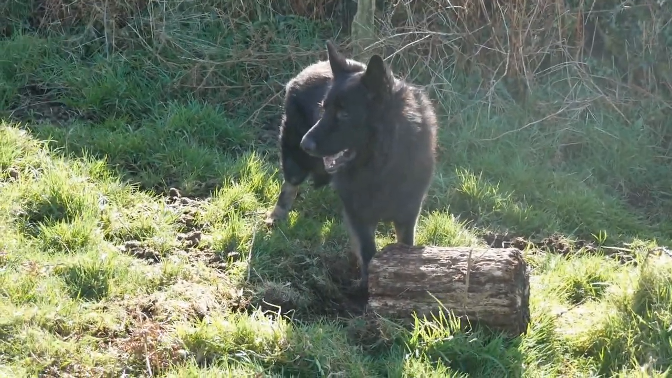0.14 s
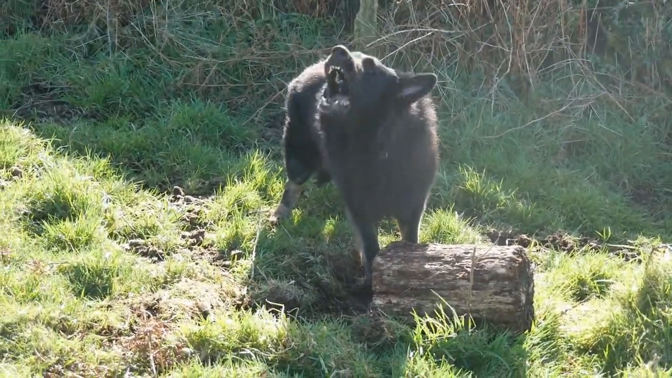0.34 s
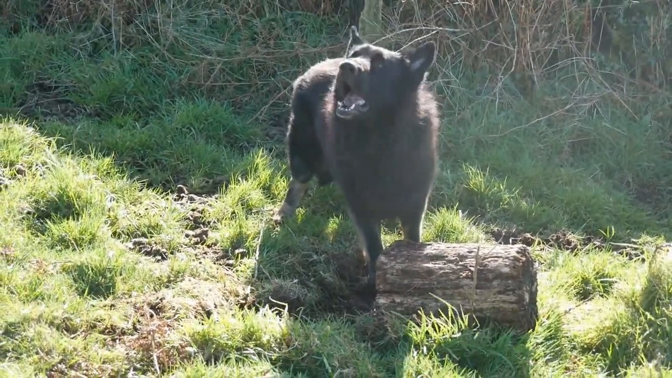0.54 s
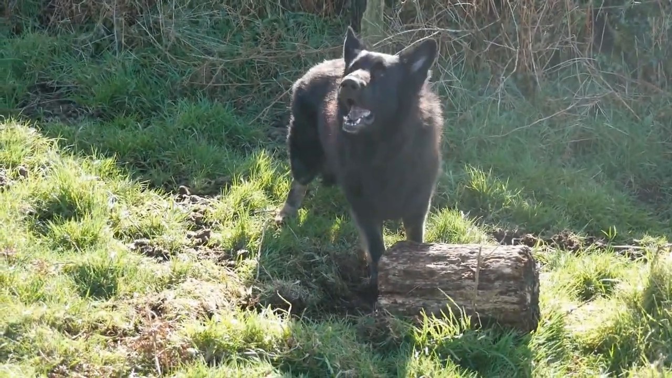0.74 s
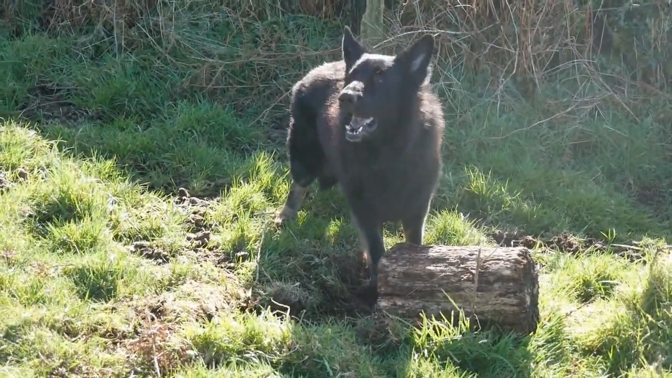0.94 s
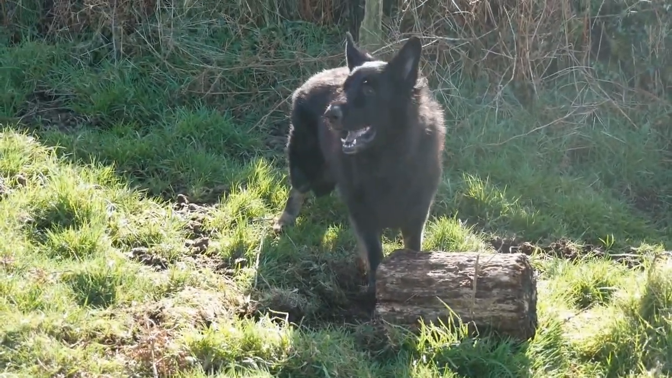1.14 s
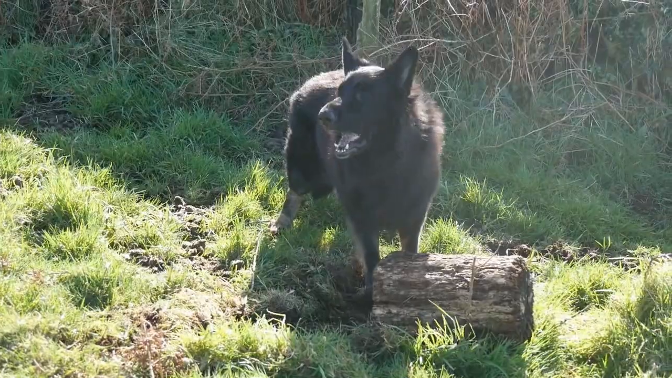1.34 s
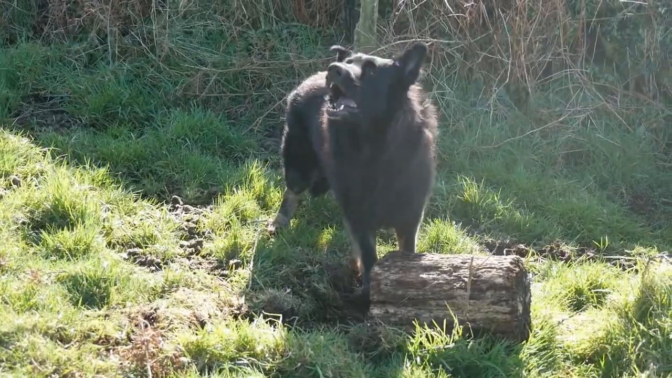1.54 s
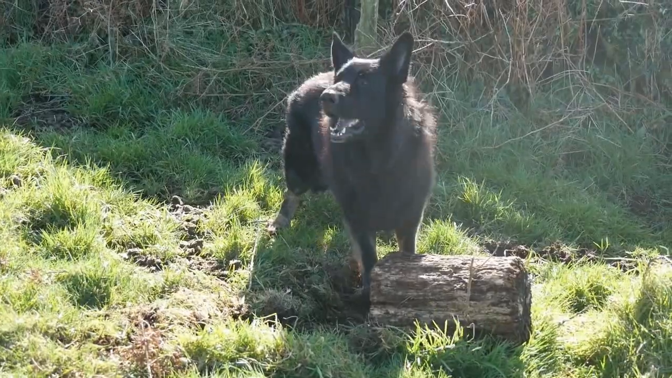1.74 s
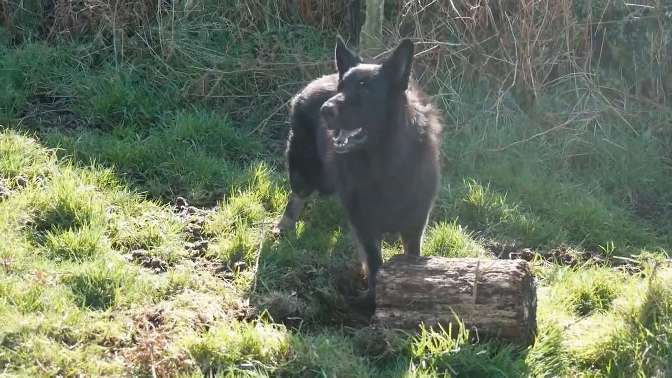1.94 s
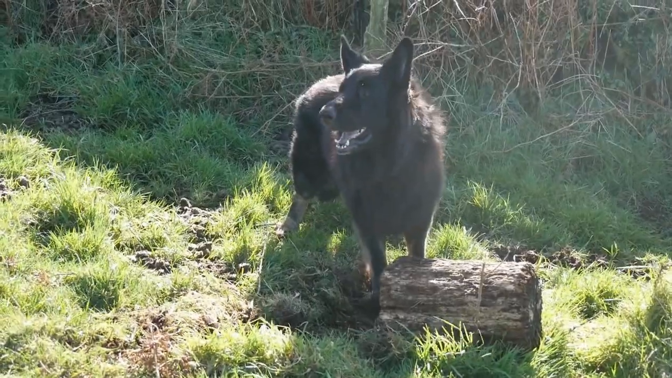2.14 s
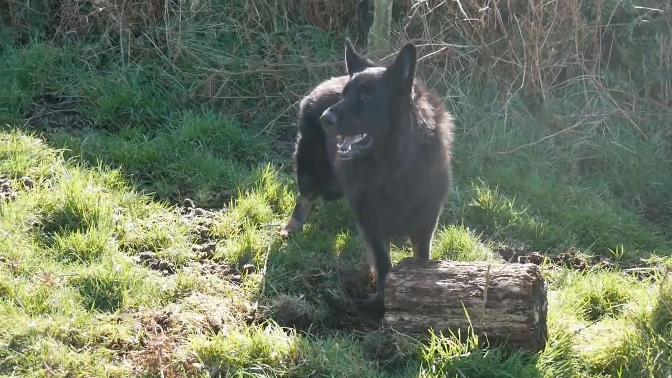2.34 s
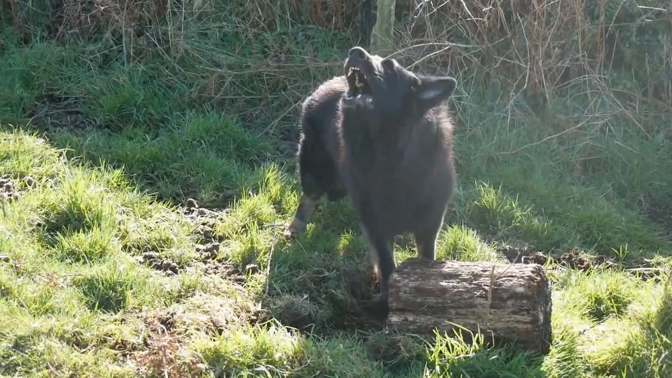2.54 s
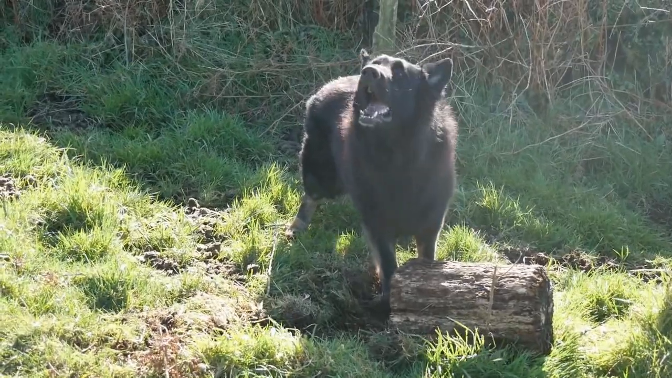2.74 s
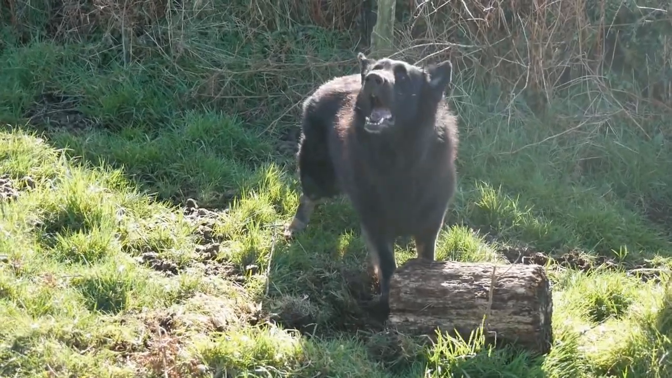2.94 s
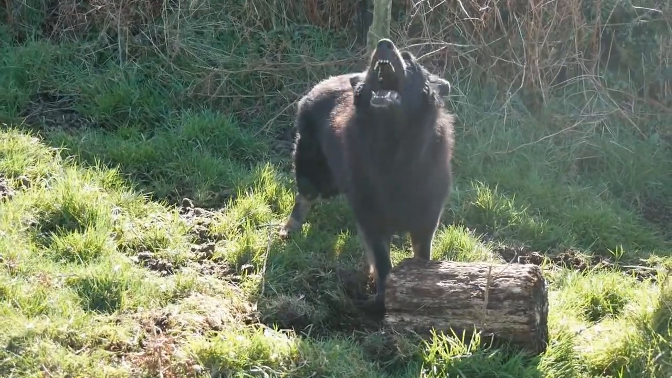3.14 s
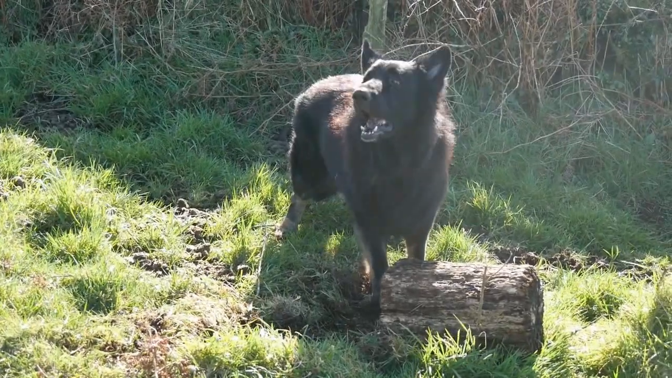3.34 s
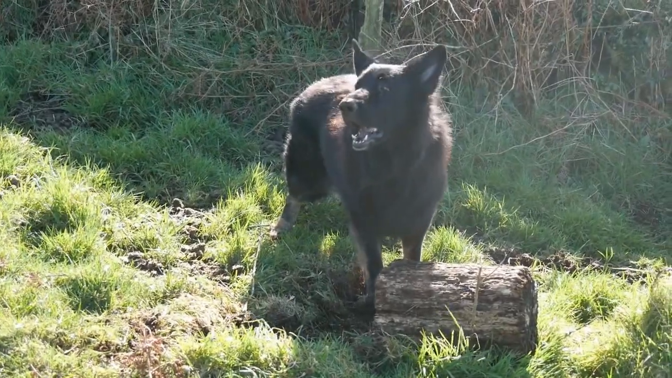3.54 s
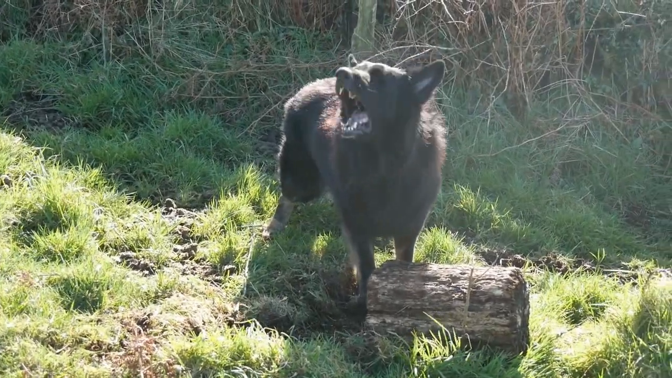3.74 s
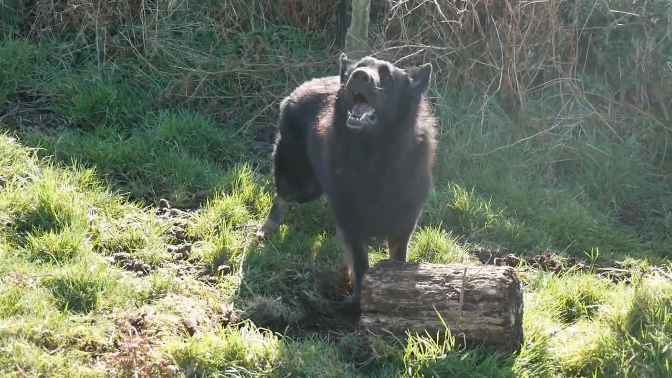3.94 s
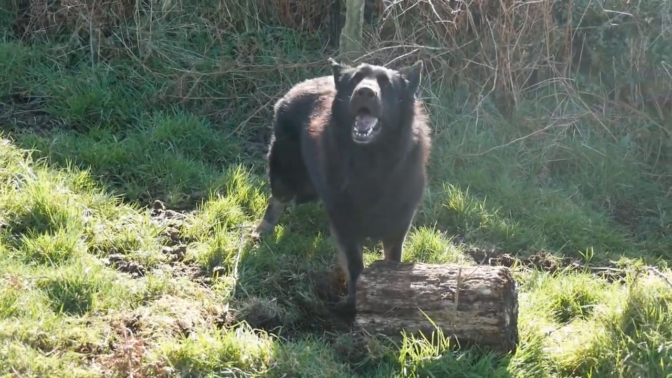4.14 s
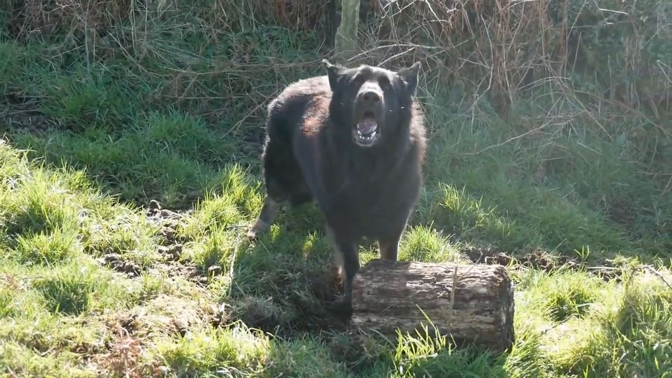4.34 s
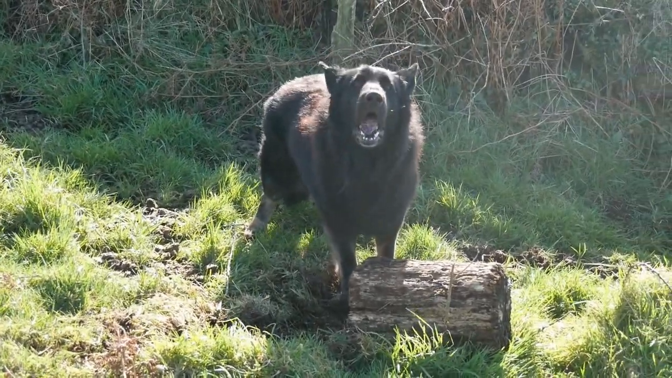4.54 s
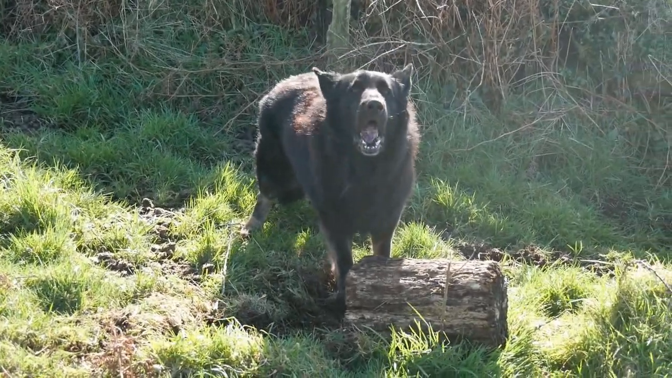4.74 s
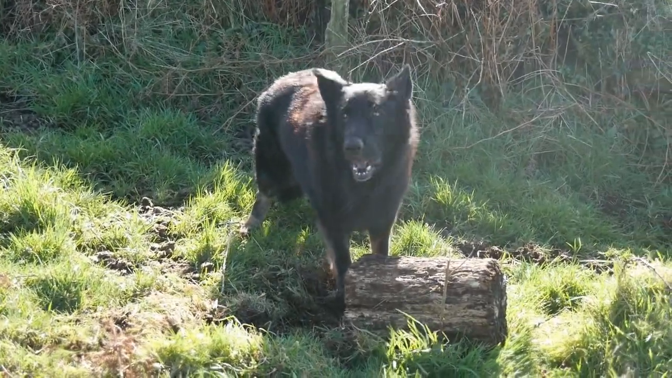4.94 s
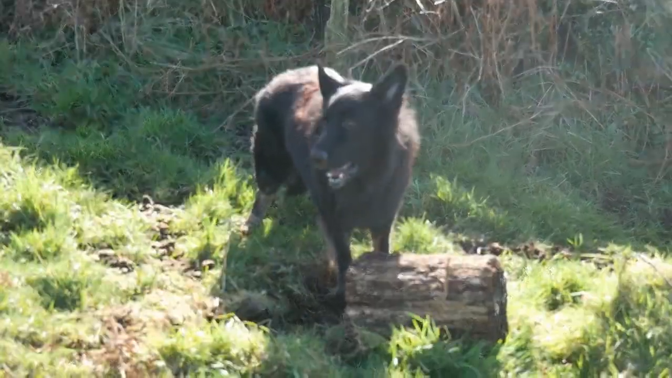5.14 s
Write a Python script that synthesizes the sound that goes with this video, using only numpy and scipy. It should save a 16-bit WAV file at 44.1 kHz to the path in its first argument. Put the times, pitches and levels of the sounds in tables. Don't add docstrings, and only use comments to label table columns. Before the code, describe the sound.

A dog outdoors gives five short, sharp, high yips, pants softly in between, then growls up into a wavering whine, with wind buffeting the microphone.

```python
import sys
import numpy as np
from scipy import signal
from scipy.fft import rfft, irfft, next_fast_len
from scipy.io import wavfile
from scipy.ndimage import uniform_filter1d

SR = 44100
rng = np.random.default_rng(int(sys.argv[2]) if len(sys.argv) > 2 else 0)


def persist_wave(psi):
    counts = np.round(np.clip(psi, -1, 1) * 32767).astype(np.int16)
    wavfile.write(sys.argv[1], SR, np.atleast_2d(counts).T)


def elevation(decibels):
    levels = np.asarray(decibels, float)
    return 10 ** (levels / 20)


N = 233553
TIME, SIZE = np.arange(N) / SR, next_fast_len(N + SR)
BINS_HZ = np.maximum(np.arange(SIZE // 2 + 1) * SR / SIZE, 1)


def rms_one(x):
    return x / np.sqrt(np.mean(x ** 2) + 1e-20)


def in_time(rows, t=TIME):
    s, *columns = np.transpose(rows)
    return [np.interp(t, s, c) for c in columns]


def at_hz(points):
    hz, value = np.transpose(points)
    return np.interp(np.log(BINS_HZ), np.log(np.maximum(hz, 1)), value)


def shape(x, response):
    return irfft(rfft(x, SIZE) * response, SIZE)[..., :N]


def drift(hz):
    return rms_one(shape(rng.standard_normal(N), 1 / (1 + (BINS_HZ / hz) ** 2)))


def tract(modes, hz, mouth_db=0, upper_db=0):
    out = 0
    for k, (centre, width, db) in enumerate(modes):
        top = elevation(db + [0, mouth_db, upper_db][min(k, 2)])
        out = out + top / (1 + 1j * (hz - centre ** 2 / hz) / width) ** 4
    return out


def pair(two, alike):
    c = np.clip(at_hz(alike), -.98, .98)
    mid, side = shape(two[0], np.sqrt(1 + c)), shape(two[1], np.sqrt(1 - c))
    return np.array([mid + side, mid - side]) / np.sqrt(2)


# start in seconds, climb to the top in seconds, first pitch in Hz, top pitch in Hz,
# level in dB.
YIPS = [
    (.333, 0.063, 567.7, 698, -13),
    (1.399, .1, 385, 790, -13.5),
    (2.489, 0.076, 453, 714.8, -12.5),
    (3.093, .068, 440, 690, -13.5),
    (3.752, .059, 459, 687, -19),
]
# pitch of the shelf in Hz, steep share of the climb [0-1],
# last kick up to the top in seconds, fall in seconds, choke at the top in dB.
YIP_MANNER = [(578, 0.7, 0.029, .029, -4), (658, .92, 0.036, 0.023, -8.5), (611, 0.78, 0.03, .036, -4.5),
              (615, .7, 0.0097, .037, -3.5), (654, 0.36, 0.015, .036, -2.5)]
# weak start in dB, early mouth resonance in dB, mouth on the shelf in dB,
# upper throat in dB, lag of the ground echo in seconds.
YIP_TONE = [(-1.5, 9, -1.5, -2.5, 0.002073), (-12, 10.5, -2, 1.5, .0019), (-4.5, 12, -4, -1, 0.00208),
            (-3.5, 5.5, -4.5, 2.5, 0.001944), (-34.5, 8.5, -10.5, 3, 0.0017)]
# centre in Hz, width in Hz, level in dB.
YIP_THROAT = [(603.5, 367, 7.5), (1150, 820, -1), (1914, 467, -14.5), (2220, 1100, -22.5),
              (4214, 1500, -37), (5735, 780, -40.5), (6500, 240, -46), (10300, 3200, -63.5)]


def voice():
    stir = stirrings(YIP_THROAT)
    yips = sum(yip(*one, stir) for one in zip(YIPS, YIP_MANNER, YIP_TONE))
    small_body = signal.butter(4, 280, "high", fs=SR, output="sos")
    return signal.sosfilt(small_body, yips + whine())


def yip(row, manner, tone, stir):
    start, climb, low_hz, top_hz, db = row
    shelf_hz, steep, kick, fall, choke = manner
    weak_db, early_db, shelf_db, upper_db, ground_s = tone
    top, end = start + climb, start + climb + fall
    share = np.linspace(0, 1, num=8)
    rise = start + (climb - kick) * share
    release_s = 0.029
    s = np.r_[rise, top - kick / 3, top, top + .4 * fall, top + .75 * fall, end, end + release_s]

    fall_ratio, release_ratio = .71, 0.74
    quick_drop = 0.51
    drop = 1 - fall_ratio
    after = np.array([1, 1 - quick_drop * drop, 1 - .9 * drop, fall_ratio, release_ratio])
    early = np.sin(np.pi / 2 * np.minimum(share / steep, 1)) ** 2
    climb_hz = low_hz + (shelf_hz - low_hz) * (.7 * early + .3 * share)
    hz = np.r_[climb_hz, top_hz - .2 * (top_hz - shelf_hz), top_hz * after]

    swell_s, release_db = 0.023, -38
    rebound = max(-4, choke - 1.5)
    swell = np.interp(rise, [start, start + swell_s], [weak_db, 0])
    level = db + np.r_[swell, choke, choke, (choke + rebound) / 2, rebound, rebound - 9, release_db]

    mouth_s = [start, start + (climb - kick) * steep * 0.48, top - kick, top - kick / 2, end]
    mouth = np.interp(s, mouth_s, [early_db - 15, early_db, shelf_db, shelf_db + 4, shelf_db + 5.5])
    upper = upper_db + np.interp(s, [start, top, end], [-0.5, 7.5, 3.5])

    catch_rough, clear_rough, let_go_rough = .55, .05, .7
    folds = [(start, catch_rough, 0), (start + .2 * climb, clear_rough, 0),
             (s[-3], clear_rough, 0), (s[-2] + .002, let_go_rough, 0)]
    rows = np.c_[s, hz, level, mouth, upper]
    return call(rows, folds, YIP_THROAT, ground_s, stir, notch_hz=3120, size=250)


# time in seconds, pitch in Hz, level in dB.
GROWL = [
    (4.302, 112.6, -33.5),
    (4.32, 111.5, -50.5),
    (4.356, 123.7, -44.5),
    (4.414, 136.6, -31),
    (4.462, 126.6, -34.5),
    (4.518, 158.9, -24.5),
    (4.556, 267.4, -22),
    (4.58, 319.3, -24),
]
# time in seconds, pitch in Hz, level in dB.
WHINE = [
    (4.651, 305.7, -25.5),
    (4.698, 356.7, -26.5),
    (4.752, 453.6, -18.5),
    (4.78, 439.8, -18.5),
    (4.825, 399.4, -20),
    (4.88, 449.2, -19),
    (4.971, 378.2, -25),
    (5.016, 291.9, -27),
    (5.036, 281, -46.5),
]
# time in seconds, roughness [0-1], throb depth [0-1].
LONG_CALL_FOLDS = [
    (4.3, .9, 0),
    (4.35, .6, 0),
    (4.38, .22, 0),
    (4.47, .22, 0),
    (4.53, .4, 0),
    (4.555, .3, .55),
    (4.6, .06, .5),
    (4.635, .025, 0),
    (5.0, .06, 0),
    (5.024, .75, 0),
]
# centre in Hz, width in Hz, level in dB.
WHINE_THROAT = [(516, 618, 15), (1199, 693, 3), (1760, 170, -47.5), (2780, 370, -19.5), (3580, 1700, -41.5),
                (5400, 4300, -42), (6780, 450, -36.5), (10300, 1600, -54)]


def whine():
    s, hz, db = np.transpose(GROWL + WHINE)
    open_hz, mouth_db_per_hz, upper_db_per_hz = 385, 0.22, 0.2233
    mouth = np.maximum(mouth_db_per_hz * (hz - open_hz), 4)
    upper = np.maximum(upper_db_per_hz * (hz - open_hz) + 1.5, -2.5)
    rows, stir = np.c_[s, hz, db, mouth, upper], stirrings(WHINE_THROAT)
    return call(rows, LONG_CALL_FOLDS, WHINE_THROAT, 0.00157, stir, notch_hz=2410, size=700)


def call(rows, folds, throat, ground_s, stir, notch_hz, size):
    out = np.zeros(N)
    span = slice(round(rows[0][0] * SR), round((rows[-1][0] + 0.014) * SR))
    t = TIME[span]
    rough, throb = in_time(folds, t)
    wobble, shimmer, rasp, breath = stir[:, span]
    hz, level_db, mouth_db, upper_db = in_time(rows, t)
    hz = uniform_filter1d(hz, size=size)
    jitter = 0.1
    phase = 2 * np.pi * np.cumsum(hz * (1 + jitter * rough * wobble)) / SR
    k = np.arange(1, int(12500 / hz.min()))[:, None][:50]
    line_hz = k * hz
    lines = tract(throat, line_hz, mouth_db, upper_db)
    notch_depth, notch_width_hz = .9, 400
    lines = lines * (1 - notch_depth / (1 + ((line_hz - notch_hz) / notch_width_hz) ** 2))
    ripple_db, ripple_hz = 1.6, 220
    pockets = np.interp(line_hz / ripple_hz, np.arange(80), rng.standard_normal(80))
    lines = lines * elevation(ripple_db * pockets * np.clip(line_hz / 1500 - .5, 0, 1))
    lines = lines / np.sqrt(np.sum(np.abs(lines) ** 2, axis=0) / 2)
    ground_gain, ground_cut_hz = 0.38, 10000
    ground = ground_gain * np.exp(-2j * np.pi * line_hz * ground_s) / (1 + (line_hz / ground_cut_hz) ** 2)
    lines = lines * (1 + ground)
    tone = np.real(lines * np.exp(1j * k * phase)).sum(axis=0) * elevation(3.9 * rough * shimmer)

    rasp_db, breath_db = 3.5, -45
    puff = 1 + .5 * np.cos(phase)
    noise = puff * (rough * elevation(rasp_db) * rasp + elevation(breath_db) * breath)
    throb_hz, throb_peak_s = 67, 4.572
    beat = 1 + throb * np.cos(2 * np.pi * throb_hz * (t - throb_peak_s))
    edges = np.clip((t - t[0]) / 0.0045, 0, 1) * np.clip((t[-1] - t) / 0.0061, 0, 1)
    gain = elevation(level_db) * np.sin(edges * np.pi / 2) ** 2
    out[span] = gain * beat * (np.sqrt(1 - rough ** 2) * tone + noise)
    return out


def stirrings(throat):
    rasp = rms_one(shape(rng.standard_normal(N), tract(throat, BINS_HZ)))
    airy = tract(throat[-1:], BINS_HZ) + elevation(-14) * tract(throat[4:-1], BINS_HZ)
    breath = rms_one(shape(rng.standard_normal(N), airy))
    return np.array([drift(110), drift(70), rasp, breath])


# centre in seconds, length in seconds, level in dB.
PANTS = [
    (.115, 0.13, -52),
    (0.814, 0.16, -57.5),
    (0.989, 0.2, -55),
    (1.25, 0.19, -57),
    (2.022, 0.12, -53.5),
    (2.302, 0.14, -52),
    (2.863, 0.1, -60),
    (4.094, 0.067, -53),
    (5.05, 0.051, -48.5),
]
# centre in Hz, width in Hz, level in dB.
PANT_TRACT = [(1080, 830, 0.5), (1339, 180, 2), (1980, 1500, -10.5), (3200, 310, -11.5),
              (7060, 4000, -24.5)]
# centre in seconds, length in seconds, level in dB.
GASPS = [
    (4.322, 0.022, -53),
    (4.545, 0.066, -66),
    (5.015, 0.035, -54),
]
# centre in Hz, width in Hz, level in dB.
GASP_TRACT = [(2320, 570, 2), (3020, 3200, -11), (5700, 3200, -12.5), (10300, 2400, -28)]


def panting():
    around_yips = []
    for (start, climb, _, _, db), (weak_db, *_) in zip(YIPS, YIP_TONE):
        around_yips.append((start + .012, 0.048, db - 27 + weak_db / 4))
        around_yips.append((start + climb + 0.048, 0.19, db - 46))
    return breaths(PANTS, PANT_TRACT) + breaths(GASPS + around_yips, GASP_TRACT)


def breaths(table, modes):
    swell = sum(elevation(db) * np.exp(-8 * ((TIME - s) / length) ** 2) for s, length, db in table)
    flutter = elevation(2 * drift(40))
    return swell * flutter * rms_one(shape(rng.standard_normal(N), tract(modes, BINS_HZ)))


# start in seconds, peak in dB, centre in Hz, length in seconds.
TICKS = [
    (1.354, -55, 2750, 0.021),
    (1.664, -57.5, 3600, 0.029),
    (1.7865, -52, 3110, 0.0091),
    (2.048, -50.5, 3030, 0.017),
    (2.127, -49.5, 3050, 0.011),
    (2.387, -46.5, 3810, 0.015),
    (5.149, -58.5, 3420, 0.0035),
    (5.238, -78.5, 2540, 0.01),
]


def ticks():
    out = np.zeros(N)
    for s, db, hz, length in TICKS:
        band = signal.butter(1, [hz * 0.86, hz * 1.2], "band", fs=SR, output="sos")
        burst = rms_one(signal.sosfilt(band, rng.standard_normal(3000)))
        burst = burst * np.exp(-TIME[:3000] / max(length, .001))
        first = round(s * SR)
        out[first:][:3000] += elevation(db - 6.0) * burst[:N - first]
    return out


# time in seconds, peak in dB, left over right in dB.
SLAPS = [(0.194, -38.5, 8), (0.702, -33, 7.5), (0.854, -18.5, 12), (1.027, -21.5, 12), (1.105, -18, 16.5),
         (1.206, -54, 12), (2.238, -23.5, 16), (2.317, -16, 16), (2.591, -24, -1), (3.379, -31, -5),
         (3.409, -23, -1.5), (3.442, -12, -11), (3.516, -41.5, -0.5), (3.537, -19, 5), (3.649, -37, -1),
         (3.682, -14, -1), (3.738, -39, 0), (3.873, -19, -7), (3.969, -10, -8), (4.242, -32, -3),
         (5.107, -30, -7.5)]
# frequency in Hz, density in dB per Hz.
RUMBLE = [(15, -77), (25, -65.5), (48, -37.5), (140, -2.5), (233, 3), (366, -1), (465, -10.5), (525, -26),
          (900, -48), (1170, -25), (1980, -120)]
# frequency in Hz, density in dB per Hz.
CRACKLE = [(150, -70.5), (250, -4.5), (291, -11.5), (335, -3.5), (569, 6), (902, -8), (2050, -28),
           (7000, -81), (9100, -107), (15400, -120)]
# frequency in Hz, left-right likeness [-1 to 1].
WIND_ALIKE = [(60, 0.98), (180, 0.74), (550, -0.76), (1650, -0.53), (4960, 0.049), (15000, 0.27)]


def wind():
    rumble, crackle = gusts()
    lumps = elevation(2.24 * np.array([drift(42), drift(31)]))
    sizes = elevation(3.45 * np.minimum(rng.exponential(1, (2, N)), 3.2)) * rng.choice([-1, 1], (2, N))
    strikes = rng.random((2, N)) < 2300 / SR
    eddies = pair(lumps * sizes * strikes, WIND_ALIKE)
    buffet = rumble * rms_one(shape(eddies, elevation(at_hz(RUMBLE))))
    buffet = buffet + crackle * rms_one(shape(eddies, elevation(at_hz(CRACKLE))))
    blows = np.zeros((2, N))
    for s, db, pan_db in SLAPS:
        blows[:, round((s + .004) * SR)] = elevation(db + np.array([.5, -.5]) * pan_db)
    thud = tract([(306, 385, 0.011)], BINS_HZ)
    return buffet + shape(blows, thud * 25)


# start in seconds, length in seconds, rumble in dB,
# crackle above rumble in dB, left over right in dB.
GUSTS = [(-.05, .2, -39, -3, -1.5), (0.124, 0.19, -37, -1.5, 3), (0.516, 0.16, -60, -20, -3),
         (0.684, 0.18, -49.5, -15, 3), (0.795, 0.072, -46.5, -3.5, 5.5), (0.963, .16, -41, -9, 1),
         (1.158, 0.053, -40, -9.5, 1.5), (1.319, 0.087, -50, -2.5, 4), (1.975, 0.16, -59, -3, 1),
         (2.15, 0.28, -38.5, -11, 2.5), (2.545, 0.02, -46.5, -4, -2.5), (2.66, 0.068, -56.5, -29, -1),
         (2.852, 0.3, -47, -47, 1.5), (3.033, 0.07, -37, -13.5, 2), (3.201, 0.11, -47.5, -16.5, -1),
         (3.332, 0.029, -23.5, -1, -3.5), (3.372, 0.097, -26, 2.5, -2), (3.478, 0.25, -31.5, 11, 0.6),
         (3.727, 0.23, -41, 16.5, 2), (3.941, 0.043, -45, 18, -7), (3.992, 0.2, -43.5, -8, 2.5),
         (4.199, 0.45, -37.5, -10, -1.5), (4.658, 0.33, -35, -28, -4.5), (5.073, .25, -48, -51, -3)]


def gusts():
    rise_s, fall_s, lull_db = 0.03, 0.038, -70
    t = TIME[::20]
    rumble, crackle = np.full((2, len(t)), elevation(lull_db)), np.full((2, len(t)), elevation(lull_db - 5))
    for s, length, db, bright_db, pan_db in GUSTS:
        swell = np.clip((t - s) / rise_s, 0, 1) ** 2 * np.exp(-np.maximum(t - s - length, 0) / fall_s)
        side = swell * elevation(db + np.array([[.5], [-.5]]) * pan_db)
        rumble, crackle = rumble + side, crackle + side * elevation(bright_db)
    return [np.array([np.interp(TIME, t, port) for port in gain]) for gain in (rumble, crackle)]


# time in seconds, peak in dB, left over right in dB, length in seconds.
CRACKS = [(3.37, -50.5, -9, 0.0027), (3.3996, -31.5, -3, 0.0021), (3.4407, -31.5, 4, 0.0043),
          (3.503, -33, 14.5, 0.0023), (3.534, -38.5, 0, 0.0028), (3.5757, -31, 1, 0.0013),
          (3.607, -32, -5.5, 0.0034), (3.674, -35, 2, 0.0018), (3.7096, -31.5, 9, 0.0045),
          (3.723, -32, 2, 0.0022), (3.8704, -27.5, -5.0, 0.0045), (3.936, -40.5, -5, 0.0027),
          (3.949, -28.5, -13.5, 0.0026), (3.982, -31, -5, 0.0014), (4.018, -51.5, -1.5, 0.0058)]


def cracks():
    gate = np.zeros((2, N))
    for s, db, pan_db, length in CRACKS:
        side = elevation(db + np.array([[.5], [-.5]]) * pan_db)
        gate[:, round(s * SR):][:, :1000] += side * np.exp(-TIME[:1000] / max(length, .0005))
    torn = gate * rng.standard_normal(N)
    edge = elevation(at_hz(CRACKLE)) * (1 + BINS_HZ / 700) ** 1.3
    return shape(torn, elevation(33.5) * edge / edge.max())


def hedge(x):
    level_db, t60_s, delay_s, cut_hz = -22, 0.32, 0.098, 2400
    late = TIME[:SR] - delay_s
    echoes = rng.standard_normal((2, SR)) * elevation(-60 * late / t60_s) * (late > 0)
    echoes = echoes / np.sqrt(np.sum(echoes ** 2) / 2)
    return elevation(level_db) * shape(x, rfft(echoes, SIZE) / (1 - 1j * cut_hz / BINS_HZ))


# frequency in Hz, density in dB per Hz.
AIR_COLOUR = [(18, -57), (30, -48), (120, -1), (182, -10.5), (224, 1.5), (242, -39), (453, -3), (805, 1.5),
              (1190, -5), (3300, -19), (4760, -24), (7040, -22), (15400, -38)]
# frequency in Hz, left-right likeness [-1 to 1].
AIR_ALIKE = [(60, 0.4), (240, -0.07), (950, -0.8), (3760, -0.19), (15000, 0.058)]


def far_hiss():
    hiss = shape(pair(rng.standard_normal((2, N)), AIR_ALIKE), elevation(at_hz(AIR_COLOUR)))
    level_db = -73.5 + 19.5
    return elevation(level_db + 0.43 * drift(8.8)) * rms_one(hiss)


def pressed(x):
    knee_db, press_share, recover_db_per_s = -39.5, 0.23, 41.5
    level_db = 10 * np.log10(uniform_filter1d(x ** 2, size=1500) + 1e-12)
    recovery_db = recover_db_per_s * TIME
    held_db = np.maximum.accumulate(level_db + recovery_db) - recovery_db
    return elevation(-press_share * np.maximum(held_db - knee_db, 0))


def ducked(dog):
    knee_db, speed_hz = -29, 34
    power = np.maximum(shape(dog ** 2, 1 / (1 + 1j * BINS_HZ / speed_hz)), 0)
    return 1 / np.sqrt(1 + power / elevation(2 * knee_db))


# frequency in Hz, left over right in dB.
PORT_BALANCE = [(60, 28), (150, -5), (380, -3.0), (950, -4), (2380, 0), (5960, 4), (15000, 4)]
# frequency in Hz, phase lead of the left in radians.
PORT_LEAD = [(0, 0.62), (3270, 0.42), (3620, -0.2), (5080, 0.21), (9990, -0.2), (11400, -0.0), (15200, 0.0)]


def scene():
    dog = voice() + panting() + ticks()
    half = elevation(at_hz(PORT_BALANCE) / 2) * np.exp(.5j * at_hz(PORT_LEAD))
    duck = ducked(dog)
    blown = duck ** .5 * wind() + cracks()
    near = shape(dog, np.array([half, 1 / half])) + blown
    return near + duck * hedge(dog) + pressed(near.mean(axis=0)) * far_hiss()


def band_limit(x):
    return signal.sosfilt(signal.butter(12, 15560, fs=SR, output="sos"), x)


def record(dry):
    dip = 1 - .85 / (1 + ((BINS_HZ - 7900) / 200) ** 2)
    return band_limit(shape(dry, dip))


dry = scene()
out = record(dry)
persist_wave(out)
```